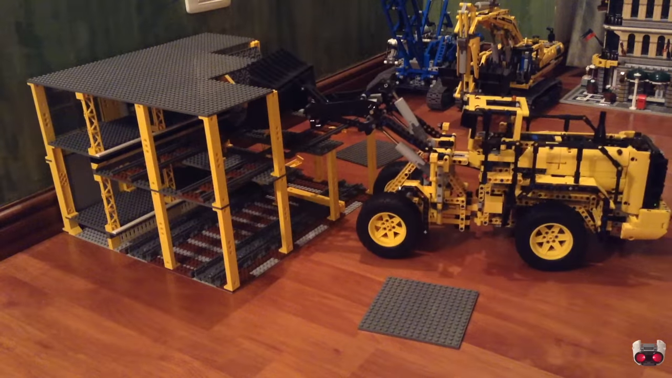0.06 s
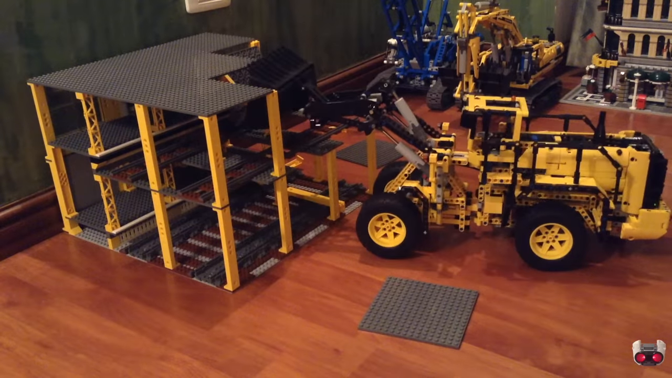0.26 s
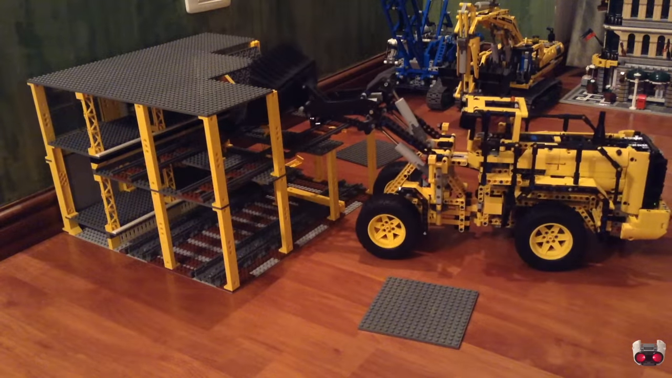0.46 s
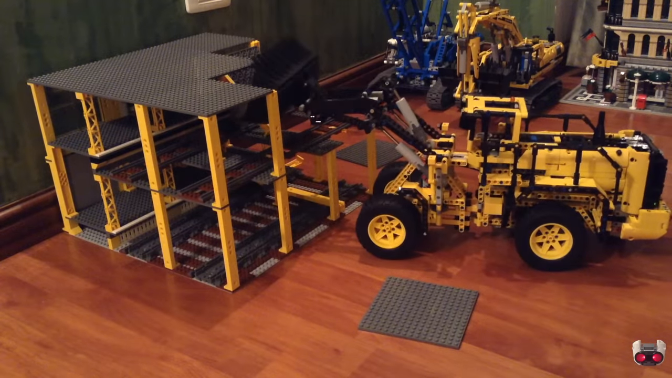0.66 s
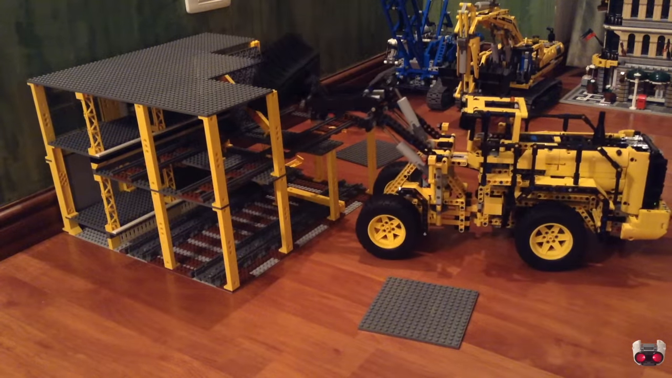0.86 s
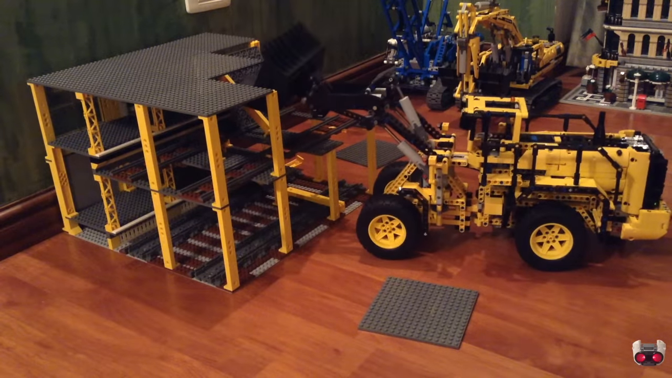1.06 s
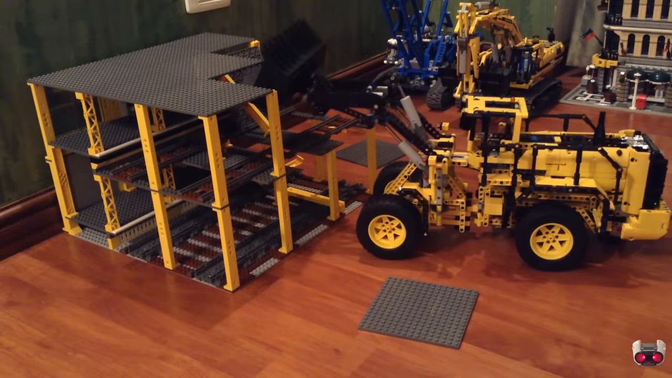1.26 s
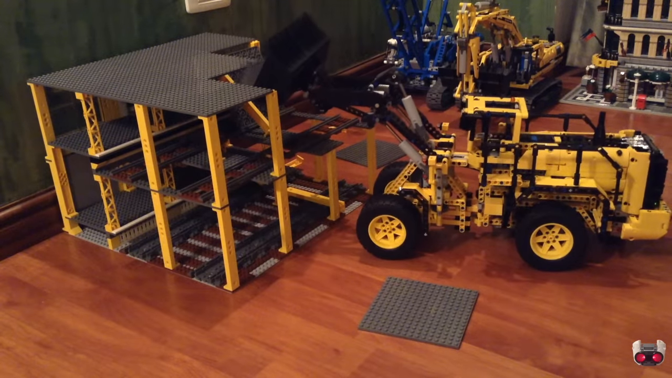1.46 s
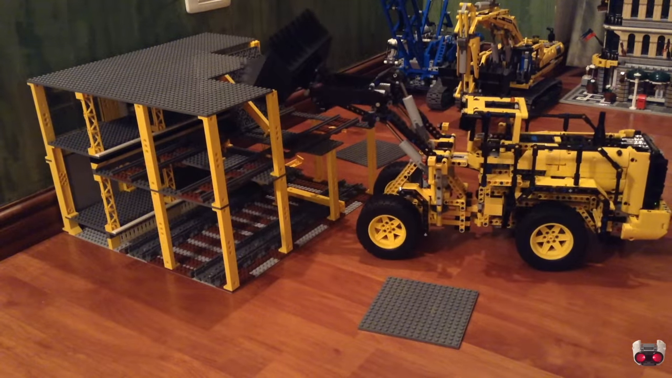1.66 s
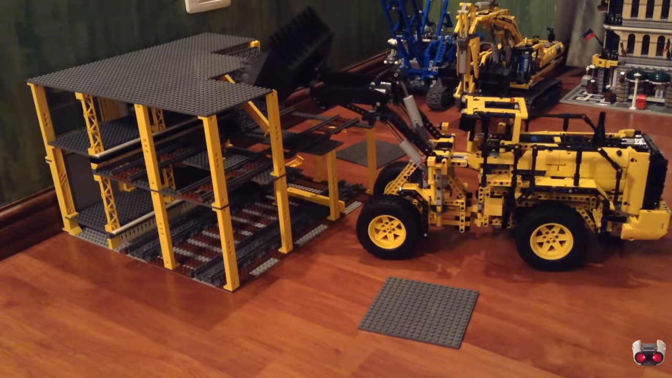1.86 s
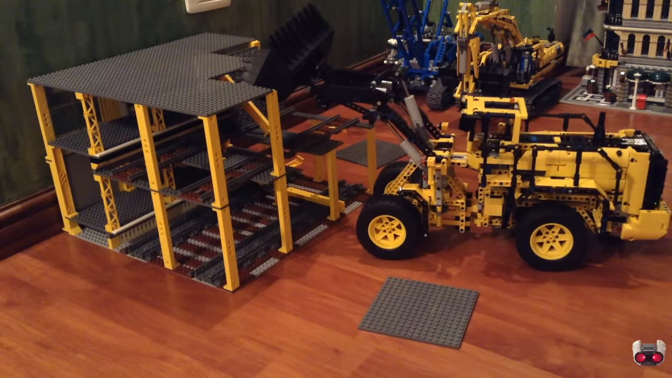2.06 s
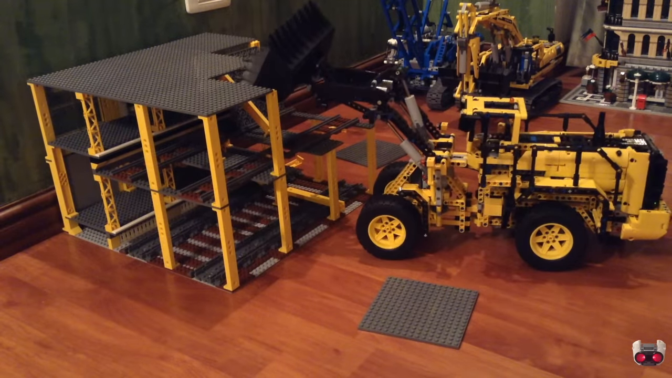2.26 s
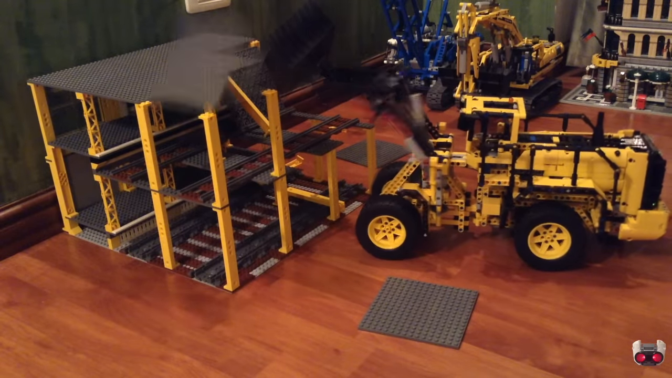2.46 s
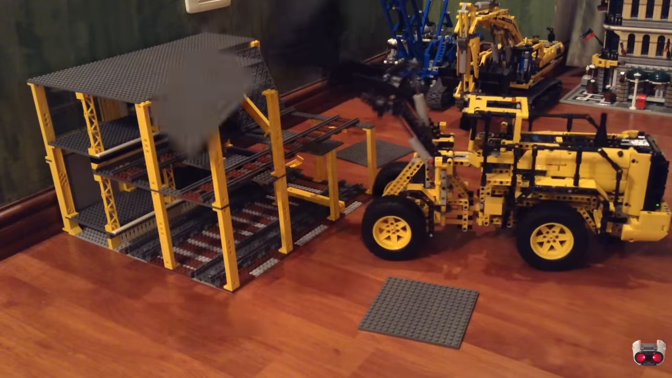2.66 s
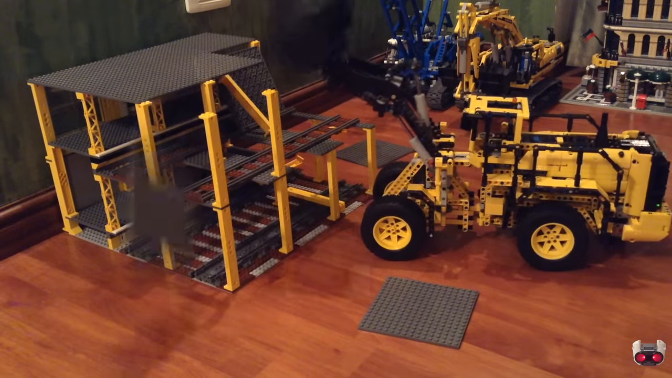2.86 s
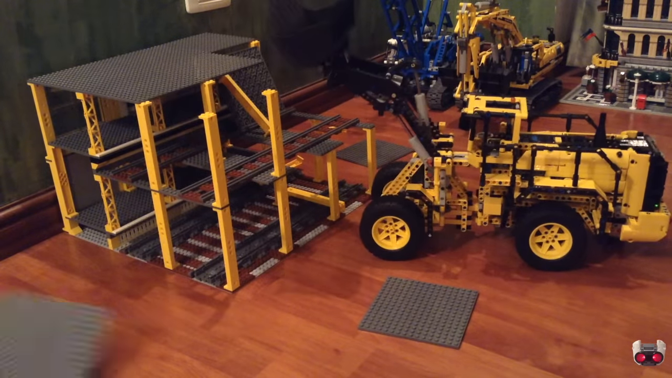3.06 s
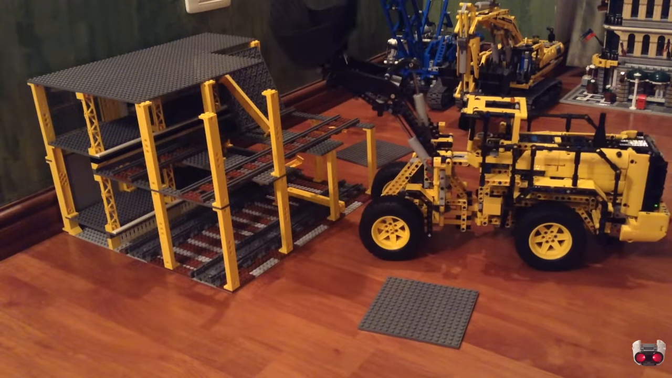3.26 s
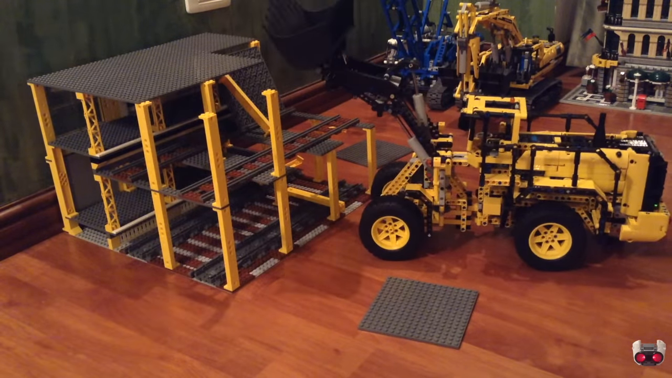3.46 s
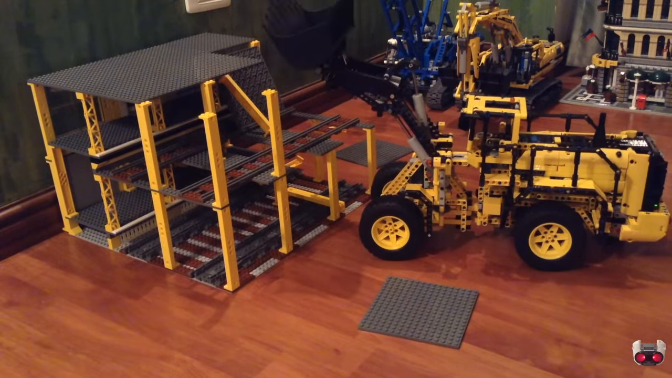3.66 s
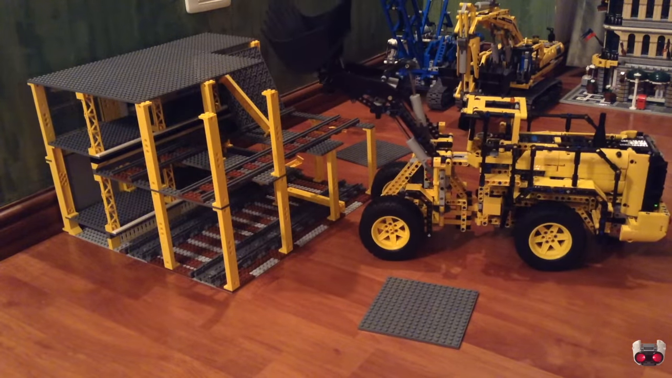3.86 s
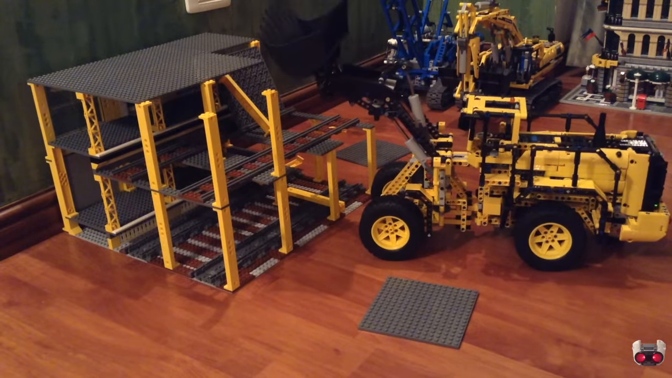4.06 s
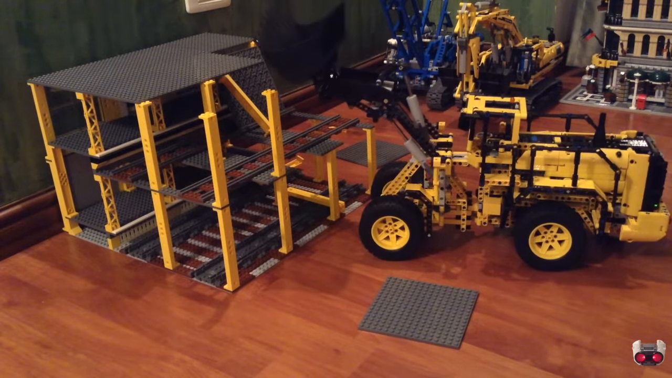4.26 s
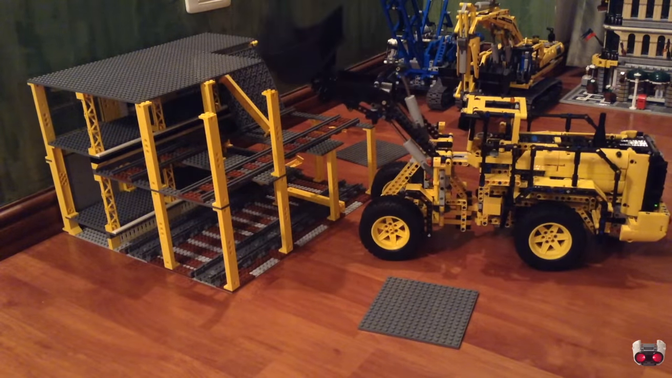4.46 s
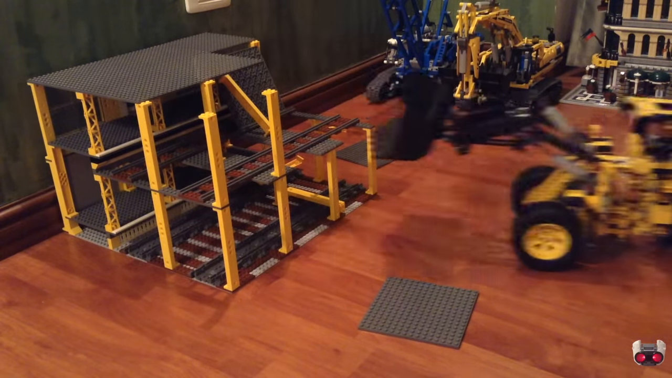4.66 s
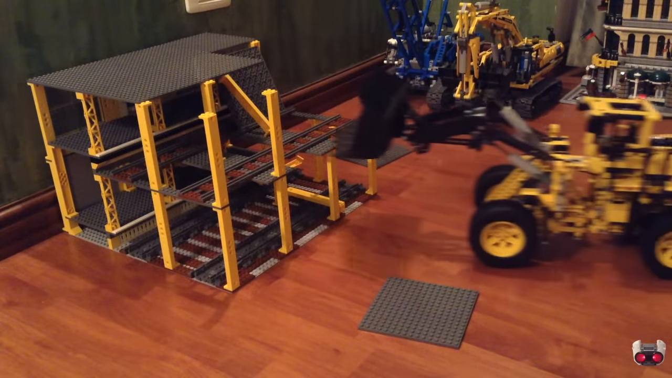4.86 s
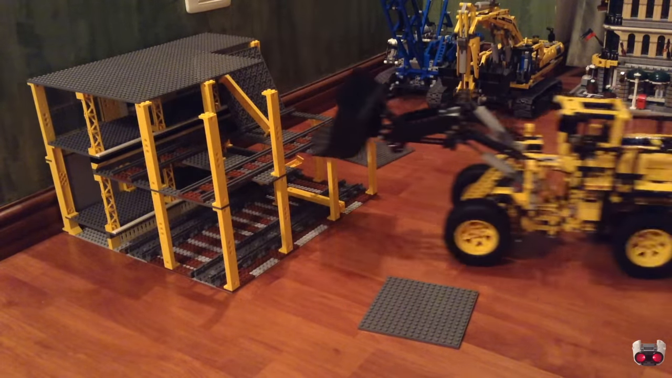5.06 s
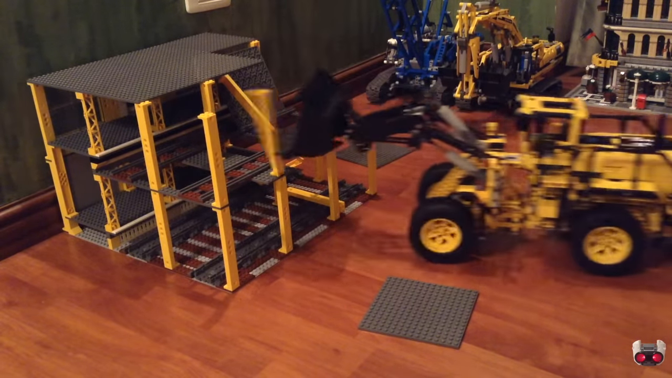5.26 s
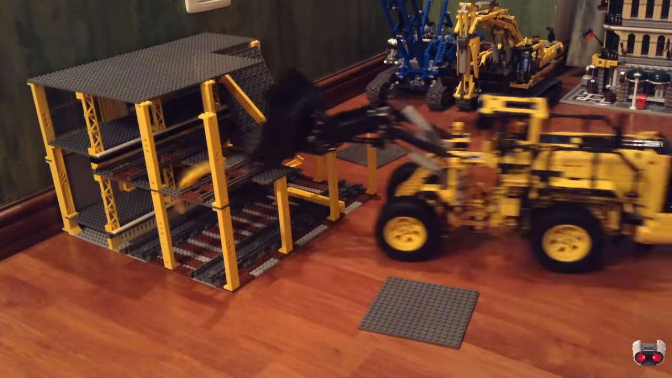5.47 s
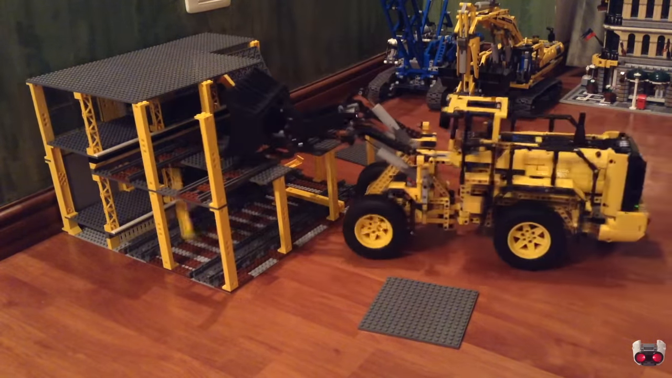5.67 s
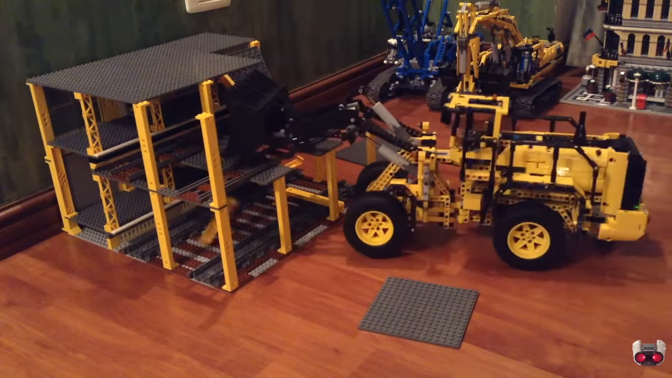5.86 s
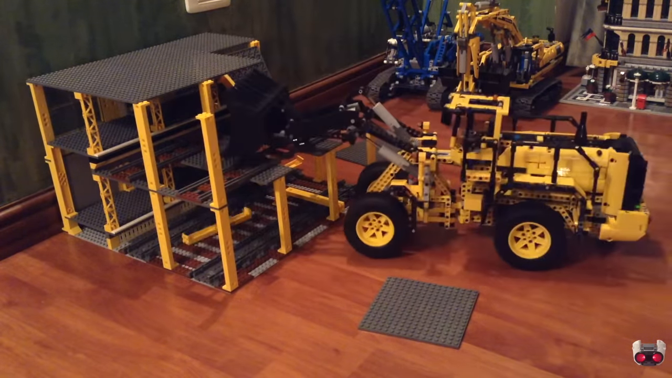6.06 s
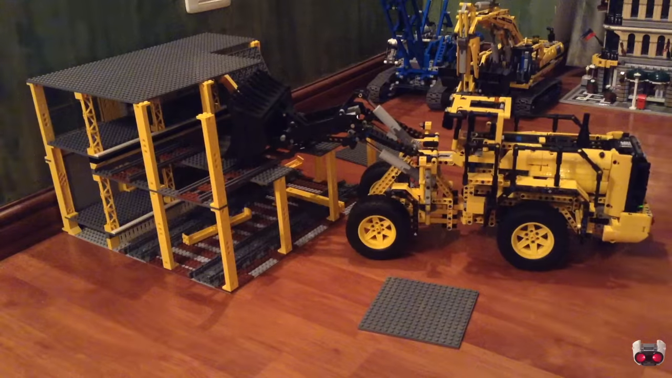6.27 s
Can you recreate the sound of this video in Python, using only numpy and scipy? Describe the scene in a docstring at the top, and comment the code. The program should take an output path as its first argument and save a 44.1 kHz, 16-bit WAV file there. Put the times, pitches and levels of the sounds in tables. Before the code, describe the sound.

Small electric gears whirr and gradually slow, with light hollow clicks as a toy bucket snags on plastic. A plate pops loose and bounces on wooden boards in a bright clatter, the loudest moment. The motor gives two brief, quieter bursts, then the toy loader rolls off, hissing and squeaking, into a run of plastic knocks and loose brick rattles. A small indoor room adds a short echo.

```python
"""A plastic click and a whirr of small gears: a motorised toy loader lifts at a brick frame in a small room.
The gears slow under load while the bucket snags the roof; a plate flips off and clatters on the wooden floor.
The bucket tilts in two short, light runs. Then the loader drives off, gears hissing, tyres rumbling and
a shaft squeaking, and rams the frame, which knocks, judders and rattles its loose bricks."""
import sys
import numpy as np
from scipy import signal
from scipy.fft import rfft, irfft
from scipy.io import wavfile

SR = 44100
rng = np.random.default_rng(int(sys.argv[2]) if len(sys.argv) > 2 else 0)


def dump(signal):
    """Clip the signal to [-1, 1] and save it as 16-bit WAV at the path in sys.argv[1]."""
    limited = np.clip(np.atleast_2d(signal).T, -1, 1)
    pcm = np.round(limited * 32767).astype(np.int16)
    wavfile.write(sys.argv[1], SR, pcm)


N = 279153
TIME = np.arange(N) / SR
COAST_DB_PER_S = 94.5  # release of an arm motor once it is switched off

# lift motor envelope: start/s, stop/s, level/dB, attack/s
LIFT_RUNS = [(0.131, 3.06, -38, 0.1)]
# tooth mesh rate, sagging under the roof and recovering when the plate lets go: t/s, f/Hz
LIFT_SPEED = [(0.13, 1130), (0.18, 1285), (0.25, 1373), (0.36, 1432), (0.52, 1402), (0.6, 1458),
              (0.87, 1372), (0.98, 1452), (1.2, 1413), (1.45, 1392), (1.6, 1331), (1.74, 1325),
              (1.98, 1238), (2.22, 1143), (2.44, 1047), (2.6, 1329), (3.05, 1406)]
# EQ of the lift housing: f/Hz, level/dB
LIFT_EQ = [(100, -27), (160, -16), (255, -9), (340, -25.5), (900, -17.5), (2000, -10.5), (2700, -6),
           (4500, -4), (6300, -1.5), (9100, -2), (10200, -4.5), (12300, -4), (13300, 0.5), (14500, -5)]
# gearbox resonances that the whine slides through: f/Hz, width/Hz, level/dB
GEARBOX_MODES = [(2540, 68, -50), (2750, 130, -67), (3550, 300, -56), (4004, 59, -45.5), (4930, 120, -46),
                 (5330, 160, -48), (5670, 240, -44), (6620, 220, -41), (7320, 160, -52)]
# chassis resonances that the shaft hum slides through: f/Hz, width/Hz, level/dB
CHASSIS_MODES = [(389, 16.4, -60.5), (352, 10, -68)]

def lift(lets_go_s=2.47, idle_hz=1440, stall_hz=1060):
    """The lift gears whirr and slow; while the roof presses the teeth together they sing and groan."""
    rate = curve(LIFT_SPEED)
    teeth = mesh(rate, flutter=0.0073)
    power = runs(LIFT_RUNS, COAST_DB_PER_S)
    whirr = gears(teeth, LIFT_EQ, whine_db=-4.5, rough_db=1) * power
    pressed = np.sqrt(power / power.max()) * undb(-COAST_DB_PER_S * np.maximum(TIME - lets_go_s, 0))
    loose_teeth = teeth + tooth_play()
    whine = sum(tone(k * loose_teeth) * swell(k * rate, GEARBOX_MODES) * undb(-3.5 * (k - 2))
                for k in range(2, 7))
    shaft_hum = unit(np.sin(2 * np.pi * teeth / 3)) * swell(rate / 3, CHASSIS_MODES)
    load = np.clip((idle_hz - rate) / (idle_hz - stall_hz), 0, 1)
    groan = undb(-74.5) * load ** 2 * tone(teeth)
    return whirr + (whine + shaft_hum + groan) * pressed

# tilt motor envelope: start/s, stop/s, level/dB, attack/s
TILT_RUNS = [(3.765, 4.239, -45.5, 0.035), (4.372, 4.6, -45, 0.018)]
# EQ of the tilt housing: f/Hz, level/dB
TILT_EQ = [(180, -55), (300, -29), (437, -16.5), (597, -10), (703, -27), (991, -15), (1310, -18),
           (1440, -12), (1590, -14.5), (2920, -5.5), (4390, -6.5), (5090, -3.5), (15000, -4.5)]
# two gear partials that stand out: multiple of mesh rate, level/dB relative to the run
TILT_WHINE = [(2, -23), (5, -17.5)]

def tilt(mesh_hz=1300, droop=0.16):
    """The motor tilts the free bucket twice; its pitch droops at spin-up and run-down."""
    power = runs(TILT_RUNS, COAST_DB_PER_S)
    teeth = mesh(mesh_hz * (1 - droop * (1 - power / power.max())), flutter=0.00697)
    loose_teeth = teeth + tooth_play()
    whine = sum(undb(db) * tone(round(k) * loose_teeth) for k, db in TILT_WHINE)
    return (gears(teeth, TILT_EQ, whine_db=-12, rough_db=0.6) + whine) * power

# plate hits, dull when flat and bright on a corner: t/s, level/dB, brightness/dB, ring f/Hz
PLATE_HITS = [(2.7235, -18.5, -2, 616), (2.741, -28, -4.5, 1103), (2.760, -25, -2.5, 643),
              (2.789, -28.5, -2, 406), (2.803, -28, 17, 8000), (2.832, -23, 9, 8300),
              (2.846, -32.5, 3, 8840), (2.8767, -27, 8, 8300), (2.9005, -26.5, 12.5, 13070),
              (2.921, -28, 1, 2070), (2.932, -28, 6.5, 3700), (2.938, -25, 9.5, 8400),
              (2.977, -25.5, 9, 14280), (2.987, -25.5, -1, 2840), (3.013, -24, 7, 8800),
              (3.020, -26, 20.5, 10900), (3.036, -22, 11, 6020), (3.119, -33.5, 6, 13200),
              (3.2005, -37, 4, 10200), (3.233, -43.5, 0, 9600), (3.271, -37, 4, 2270),
              (3.2795, -26.5, 4.5, 2250), (3.32, -40.5, 0, 1010), (3.3505, -34, 7, 6400)]
# plate resonances: f/Hz, width/Hz, level/dB
PLATE_MODES = [(416.6, 16.6, 9.5), (440, 16, 13), (507, 11, 5), (613, 14, 0.5), (719, 13, 4),
               (813, 9.5, 1.5), (977, 6.5, 7), (1088, 12, 3), (1230, 7.8, -13), (1555, 22, 0.5),
               (1940, 27, -6), (2536, 63, -8), (3350, 110, -2)]

def falling_plate():
    """The roof plate clatters down, ringing at each bounce."""
    bounces = hits(PLATE_HITS, contact_s=0.0067, ring_db=-10, ring_lean=-0.1, ring_s=0.0043,
                   boom_db=-17.5, thud_db=-5.5, clack_db=-2, tick_db=-1, body_s=0.0016)
    return ring(bounces, PLATE_MODES)

# knocks on the frame: t/s, level/dB, brightness/dB, ring f/Hz
FRAME_HITS = [(5.268, -36.5, 0.5, 920), (5.4645, -30, -4, 2850), (5.481, -35, 4, 3200),
              (5.565, -23, 11.5, 5620), (5.6325, -26, -1.5, 1830), (5.7468, -31.5, 0.5, 2220),
              (5.758, -31, -6, 2050), (5.788, -31, 4.5, 1773), (5.8552, -36, -0.5, 3000),
              (5.877, -38, 16, 6500), (5.9215, -34, 7, 2400), (5.957, -34, 0, 2140),
              (5.9895, -32.5, 2.5, 2180), (6.004, -27, 9.5, 2940), (6.049, -34, 4.5, 2750),
              (6.104, -36, 4.5, 2460)]
# frame resonances: f/Hz, width/Hz, level/dB
FRAME_MODES = [(370, 37, 9.2), (559.4, 11, 11.3), (605, 5.5, 1.9), (1661, 30, 3.2), (1850, 22, 1.1),
               (2440, 8, 1.4), (2570, 42, 0.96), (4850, 210, 3.5), (6430, 120, 11.5), (7630, 47, 5.6)]

def rammed_frame():
    """The loader rams the brick frame, which knocks and rings."""
    knocks = hits(FRAME_HITS, contact_s=0.006, ring_db=-5, ring_lean=-0.4, ring_s=0.0036,
                  boom_db=-19, thud_db=-5, clack_db=3, tick_db=-4.5, body_s=0.0067)
    return ring(knocks, FRAME_MODES)

# bucket jolts: t/s, level/dB, brightness/dB, contact/s
SNAGS = [(0.001, -42.5, -2, 0.02), (0.523, -40.5, -0.5, 0.042), (0.548, -42, -3.5, 0.0058),
         (0.875, -42, -2.5, 0.016), (0.906, -40.5, 3.5, 0.008), (1.29, -42, 1, 0.02),
         (1.305, -39, 1, 0.0089), (1.365, -45, -3.5, 0.012), (1.476, -42.5, -8, 0.017),
         (1.641, -43.5, -1.5, 0.032), (2.472, -39, -1, 0.011), (2.483, -33.5, -3, 0.007),
         (2.494, -31, 3.5, 0.0066), (2.507, -33.5, -9.5, 0.0072), (2.571, -40.5, 10, 0.0068),
         (3.431, -42, 16, 0.0054), (3.449, -33.5, 3.5, 0.0061), (3.46, -39.5, 4.5, 0.0065)]
# hollow bucket resonances: f/Hz, width/Hz, level/dB
BUCKET_MODES = [(413, 105, 0.5), (562, 61, -3.5), (1160, 250, -7)]

def bucket_snags():
    """The bucket catches on the roof, jolts in its linkage and rings hollow."""
    jolts = sum(blow(*row, boom_db=-15.5, thud_db=-3.5, clack_db=2.5, tick_db=0.5, body_s=0.012)
                for row in SNAGS)
    return ring(jolts, BUCKET_MODES)

# drive faders: t/s, gear level/dB, tyre level/dB
DRIVE_FADERS = [(4.595, -64, -99), (4.615, -36.5, -50), (5.1, -34, -52), (5.4, -33, -44.5),
                (5.72, -34.5, -39), (5.83, -45, -46), (5.9, -70, -44.5), (6.15, -68, -63), (6.3, -63, -97)]
# tooth mesh rate of the drive: t/s, f/Hz
DRIVE_SPEED = [(4.6, 1181), (4.7, 1322), (4.98, 1358), (5.2, 1261), (5.45, 1244), (5.8, 1040), (6.2, 800)]
# EQ of the drive housing: f/Hz, level/dB
DRIVE_EQ = [(600, -45), (1000, -29), (1400, -18), (1900, -17.5), (2500, -10.5), (3200, -16), (4500, -16.5),
            (6000, -12), (8000, -7.5), (9400, -2), (11000, -6), (12800, -2.5), (13800, -9), (15000, -16.5)]
# EQ of the tyres: f/Hz, level/dB
TYRE_EQ = [(76, -57), (130, -79), (161, -18), (203, -27), (232, -19), (291, -17), (423, -9.5), (632, -9.5),
           (1100, -20.5), (1430, -19), (2420, -120)]

def drive():
    """The drive gears hiss and the tyres rumble on the boards."""
    teeth = mesh(curve(DRIVE_SPEED), flutter=0.00934)
    hiss = gears(teeth, DRIVE_EQ, whine_db=-4.5, rough_db=1)
    rumble = colour(clicks(4000, scatter_db=3.2), TYRE_EQ)
    return hiss * fader(DRIVE_FADERS, column=1) + rumble * fader(DRIVE_FADERS, column=2)

# shaft rubs: t/s, level/dB, length/s
SQUEAKS = [(4.61, -45.5, 0.045), (4.824, -42, 0.031), (4.982, -42.5, 0.0223), (5.151, -37, 0.014),
           (5.325, -43, 0.014)]

def shaft_squeaks(rub_hz=2765, freed_hz=2450, sag_s=0.046):
    """A drive shaft rubs once a turn; the pitch sags as it comes free."""
    squeaks = np.zeros(N)
    roughness = 1 + 0.034 * walk(234)
    for start, db, length in SQUEAKS:
        stop = start + length
        hz = curve([(stop, rub_hz), (stop + sag_s, freed_hz)]) * roughness
        rub = runs([(start, stop, db, 0.0059)], fall_db_per_s=330)
        squeaks += rub * unit(np.sin(2 * np.pi * np.cumsum(hz) / SR))
    return squeaks

# EQ of the loose bricks: f/Hz, level/dB
RATTLE_EQ = [(100, -45.5), (165, -19.5), (300, -24), (373, 8.5), (450, -27), (625, 3), (850, -12.5),
             (1160, -12), (1700, -7.5), (2400, -8.5), (3500, -6.5), (6500, -3.5), (9000, -14.5),
             (15000, -24)]

def loose_bricks():
    """Each hit on the plate or the frame shakes loose bricks into chatter."""
    power = shaken(PLATE_HITS, share_db=-18.5) + shaken(FRAME_HITS, share_db=-8.5)
    return colour(clicks(800, scatter_db=2.1), RATTLE_EQ) * np.sqrt(power)

# bucket scraping the frame: start/s, stop/s, level/dB, attack/s
SCRAPES = [(5.266, 5.285, -39.5, 0.0031)]
# frame sliding on the floor: start/s, stop/s, level/dB, attack/s
SHOVES = [(5.6, 6.08, -48.5, 0.022)]

def frame_friction():
    """Tiny slips: the bucket scrapes the frame, which drones, then judders along the floor."""
    slips = clicks(900, scatter_db=2)
    scrape = unit(band(slips, 890, 1070, order=2))
    drone = undb(-6) * unit(band(slips, 224, 248, order=2))
    judder = unit(band(slips, 345, 404, order=2))
    return (scrape + drone) * runs(SCRAPES, fall_db_per_s=153) + judder * runs(SHOVES, fall_db_per_s=304)

# partials of every gear train: multiple of mesh rate, level/dB
GEAR_WHINE = [(1, -25.5), (2, -19), (3, -19.5), (4, -18), (5, -19), (6, -34.5)]

def gears(teeth, housing, whine_db, rough_db):
    """Teeth slide once a mesh under uneven pressure and ring the housing; the mesh harmonics whine."""
    sliding = rng.standard_normal(N) * (1 + 0.25 * np.cos(2 * np.pi * teeth))
    whirr = colour(sliding * undb(rough_db * walk(190)), housing)
    return whirr + undb(whine_db) * sum(undb(db) * tone(round(k) * teeth) for k, db in GEAR_WHINE)

def mesh(rate, flutter):
    """Count of gear teeth that have passed; the speed flutters a little."""
    return np.cumsum(rate * (1 + flutter * walk(61))) / SR

def tooth_play():
    """Slack between the teeth, as a share of a tooth, makes the whine rasp."""
    return 0.049 * walk(60)

def tone(cycles):
    """A gear partial of rms 1 that wavers as the shafts wobble."""
    return unit(undb(2.7 * walk(25)) * np.sin(2 * np.pi * cycles))

def swell(hz, modes):
    """Gain of a gliding partial as it passes through resonances."""
    return np.sqrt(sum(undb(db) ** 2 / (1 + (2 * (hz - centre) / width) ** 2)
                       for centre, width, db in modes))

def blow(s, db, bright_db, contact_s, boom_db, thud_db, clack_db, tick_db, body_s, piece=()):
    """A contact is a dying noise burst in bands; brightness moves its weight from thud to tick."""
    out, t = np.zeros(N + SR), TIME[:SR // 4]
    lean = np.array([-bright_db, 0, bright_db])
    thud, clack, tick = db + lean - 10 * np.log10(np.sum(undb(lean) ** 2))
    parts = [(167, 387, thud + boom_db, 0.1),  # the floor booms
             (321, 1170, thud + thud_db, contact_s + body_s),  # the body thuds
             (1334, 4410, clack + clack_db, contact_s * 1.7),  # the edges clack and tick
             (4650, 13900, tick + tick_db, contact_s)]
    if piece:  # the struck piece rings
        ring_hz, ring_db, ring_s = piece
        parts.append((ring_hz * .93, ring_hz * 1.07, db + ring_db, ring_s))
    start = int(s * SR)
    attack = 1 - np.exp(-t / 0.0004)  # the plastic gives
    for lo_hz, hi_hz, part_db, decay_s in parts:
        burst = band(rng.standard_normal(len(t)) * attack * np.exp(-t / decay_s), lo_hz, hi_hz)
        level = np.sqrt(np.sum(burst ** 2) / (0.022 * SR))  # energy spread over 22 ms
        out[start:start + len(t)] += undb(part_db) * burst / level
    return out[:N]

def hits(rows, contact_s, ring_db, ring_lean, ring_s, halving_db=32, **body):
    """Blows on one object; a brighter one is shorter, and its ring shifts ring_lean dB per dB."""
    return sum(blow(s, db, bright, contact_s * .5 ** (bright / halving_db),
                    piece=(hz, ring_db + ring_lean * bright, ring_s), **body)
               for s, db, bright, hz in rows)

def ring(x, modes):
    """Narrow resonances of a plastic part, added to the blows that excite them."""
    return x + sum(undb(db) * signal.lfilter(*signal.iirpeak(hz, hz / width, SR), x)
                   for hz, width, db in modes)

def shaken(rows, share_db, rise_s=0.02, settle_s=0.065):
    """Power of the chatter, which swells and settles after each blow."""
    power = np.zeros(N)
    for s, db, *_ in rows:
        start = int(s * SR)
        t = TIME[:N - start]
        power[start:] += (undb(db + share_db) * (1 - np.exp(-t / rise_s)) * np.exp(-t / settle_s)) ** 2
    return power

def clicks(rate, scatter_db):
    """Random tiny impacts, rate a second, of scattered strength."""
    impacts = (rng.random(N) < rate / SR) * rng.standard_normal(N)
    return unit(impacts * undb(scatter_db * np.clip(rng.standard_normal(N), -2, 2)))

def runs(rows, fall_db_per_s):
    """Attack, hold and release envelope, once for each row."""
    return sum((1 - np.exp(-np.maximum(TIME - start, 0) / attack_s))
               * undb(db - fall_db_per_s * np.maximum(TIME - stop, 0))
               for start, stop, db, attack_s in rows)

def fader(rows, column):
    """Gain along one dB column of a curve, silent outside it."""
    rows = np.array(rows)
    return undb(np.interp(TIME, rows[:, 0], rows[:, column], left=-200, right=-200))

def curve(rows):
    """Join (t/s, value) rows by straight lines."""
    return np.interp(TIME, *np.transpose(rows))

def walk(hz):
    """Smooth random wander of rms 1."""
    low_pass = np.exp(-(np.fft.rfftfreq(N, 1 / SR) / hz) ** 2)
    return unit(irfft(rfft(rng.standard_normal(N)) * low_pass, N))

def colour(x, eq):
    """Shape x with an EQ of (f/Hz, level/dB) points, at rms 1."""
    hz, db = np.transpose(eq)
    gain = undb(np.interp(np.log(np.fft.rfftfreq(N, 1 / SR) + 1), np.log(hz), db))
    return unit(irfft(rfft(x) * gain, N))

def band(x, lo_hz, hi_hz, order=3):
    """Causal band-pass."""
    return signal.sosfilt(signal.butter(order, [lo_hz, hi_hz], "band", fs=SR, output="sos"), x)

def undb(db):
    """Decibels to gain."""
    return 10 ** (np.asarray(db) / 20)

def unit(x):
    """Scale to rms 1."""
    return x / np.sqrt(np.mean(x ** 2))

# reverb decay: f/Hz, t60/s
ROOM_DECAY = [(150, 0.64), (500, 0.38), (1500, 0.68), (4000, 0.41), (9000, 0.35), (15000, 0.18)]

def room(x, wet_db):
    """A small hard room: a dense tail that dies sooner in the treble."""
    t = TIME[:SR]
    noise = rfft(rng.standard_normal(SR))
    log_hz = np.log(np.arange(SR // 2 + 1) + 1)
    centres, t60s = np.transpose(ROOM_DECAY)
    bands = [irfft(noise * np.interp(log_hz, np.log(centres), share), SR) for share in np.eye(len(t60s))]
    tail = sum(part * 1000 ** (-t / t60) for part, t60 in zip(bands, t60s))
    tail *= np.clip(t / 0.0054 - .5, 0, 1)  # short pre-delay and fade-in
    return x + undb(wet_db) * signal.fftconvolve(x, tail / np.sqrt(np.sum(tail ** 2)))[:N]

# EQ of the room tone: f/Hz, level/dB
AIR_EQ = [(20, -34), (30, -30), (60, -23), (100, -1.5), (140, -10), (170, 7.5), (205, -23.5), (245, 2.5),
          (330, -18.5), (500, -38), (1000, -12.5), (3000, -13), (8000, -17), (15000, -45)]

def room_air():
    """A faint, steady bed of air noise."""
    return undb(-66) * colour(rng.standard_normal(N), AIR_EQ)

def scene():
    """Motors and wetter brick sounds in the room over faint air, the same in both channels."""
    air = room_air()
    motors = room(lift() + tilt() + drive() + shaft_squeaks(), wet_db=-8)
    bricks = bucket_snags() + falling_plate() + rammed_frame() + loose_bricks() + frame_friction()
    mono = undb(-2.5) * (motors + room(bricks, wet_db=-5)) + air
    return np.array([mono, mono])

def record(dry, top_hz=15300):
    """A steep low-pass cuts the top."""
    return signal.sosfiltfilt(signal.ellip(10, .05, 60, top_hz, fs=SR, output="sos"), dry)

dry = scene()
out = record(dry)
dump(out)
```